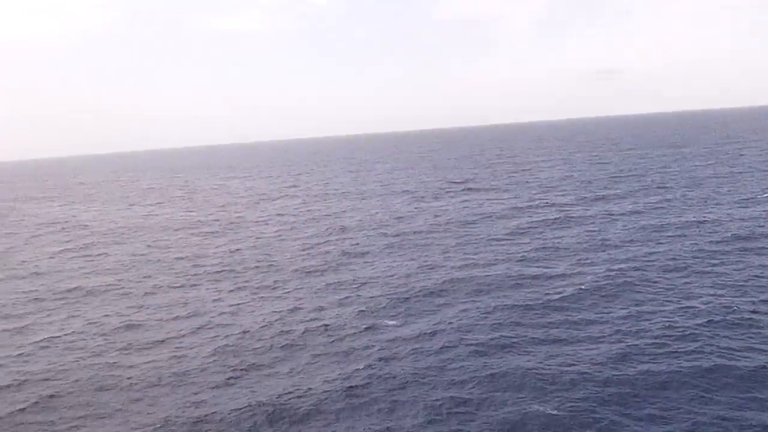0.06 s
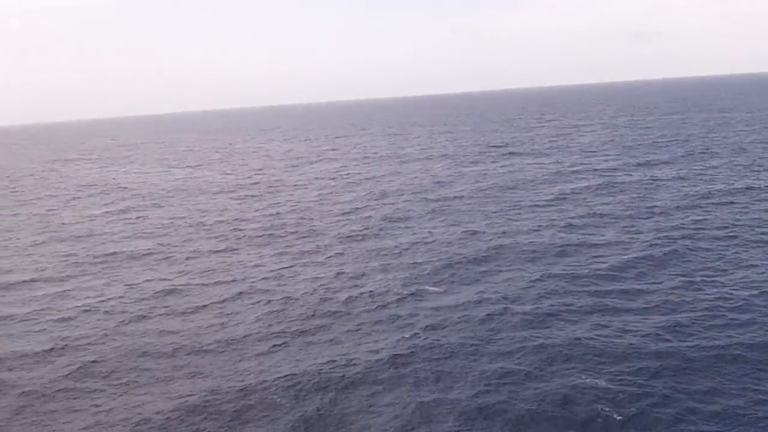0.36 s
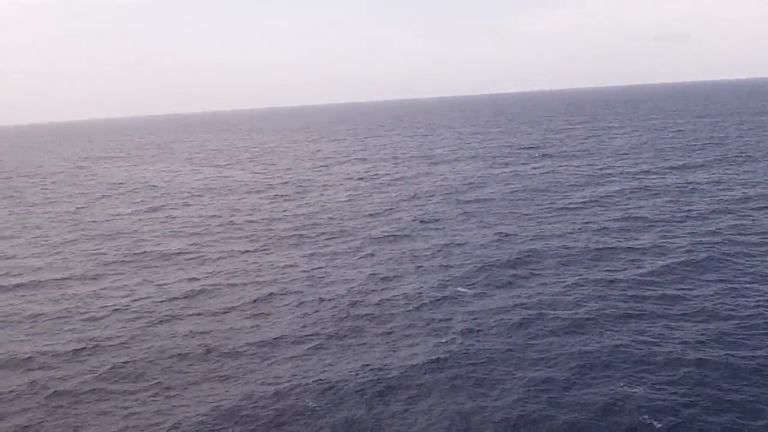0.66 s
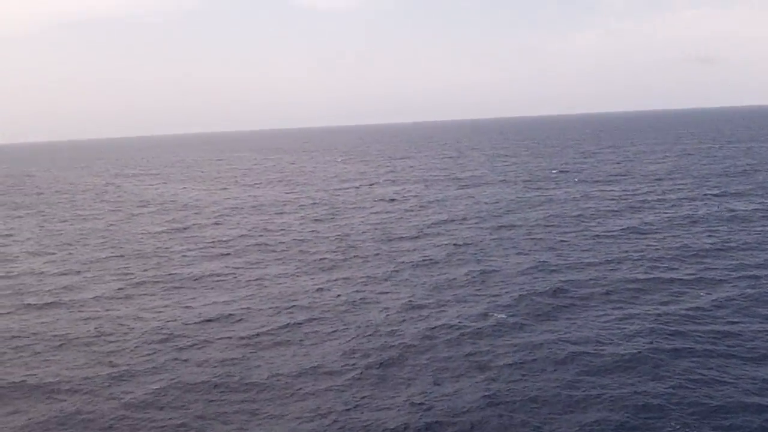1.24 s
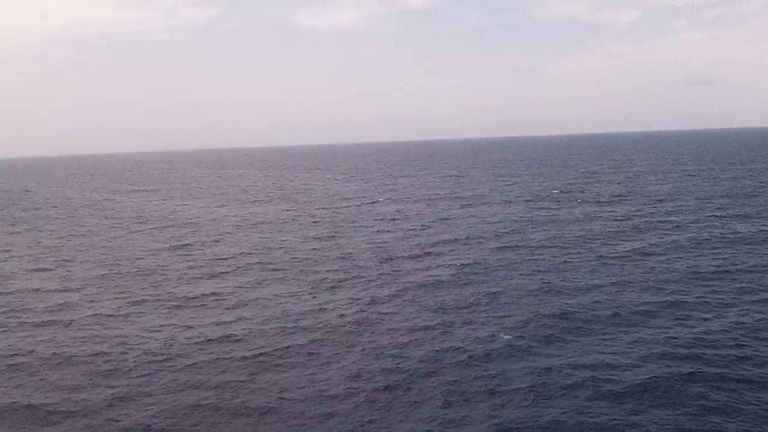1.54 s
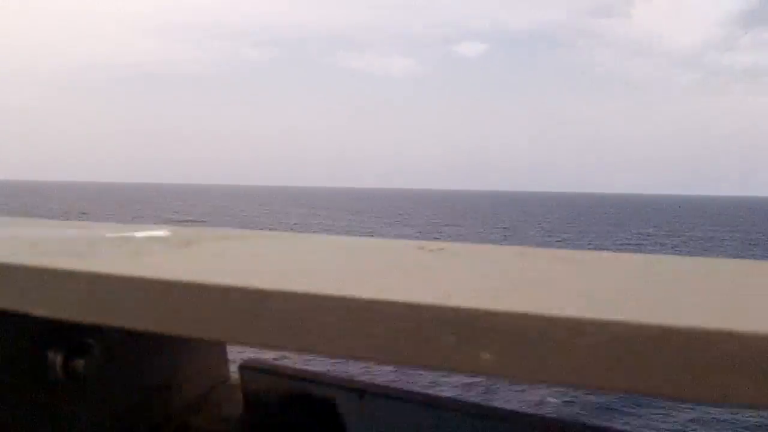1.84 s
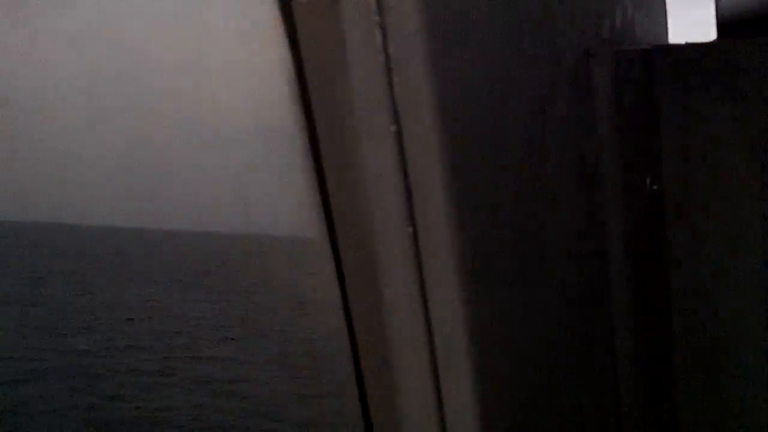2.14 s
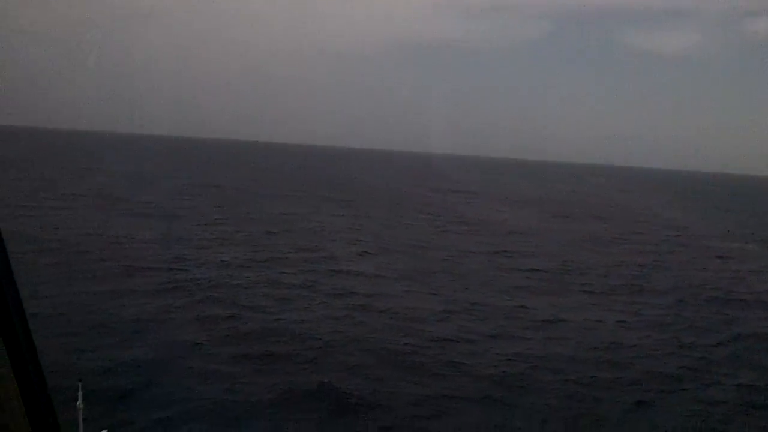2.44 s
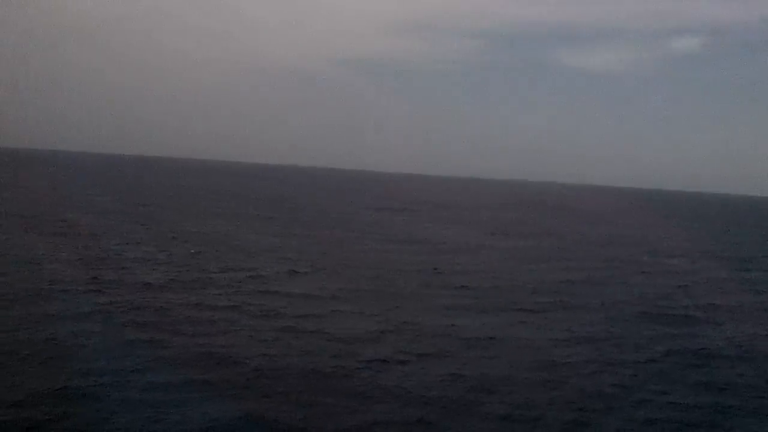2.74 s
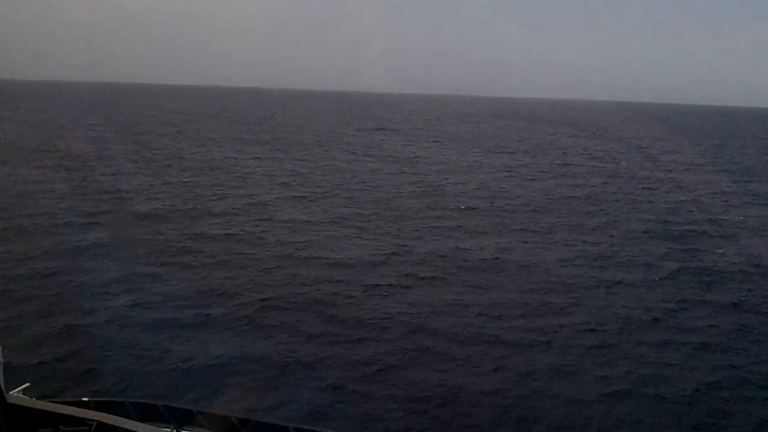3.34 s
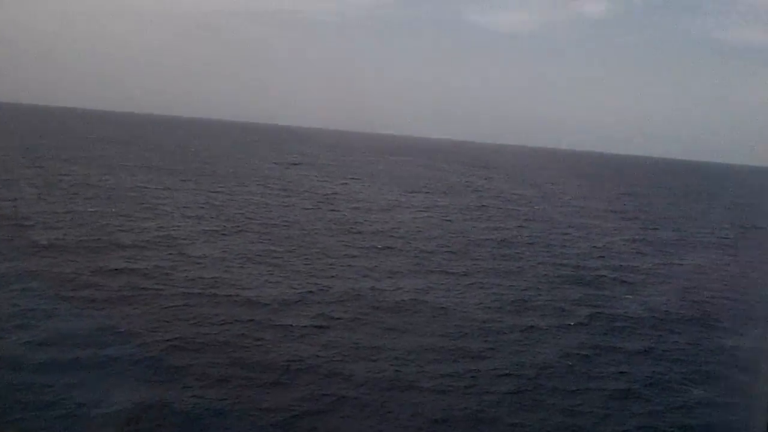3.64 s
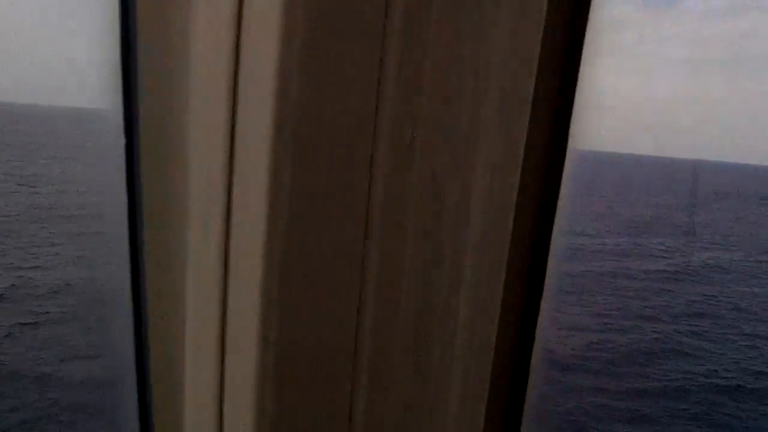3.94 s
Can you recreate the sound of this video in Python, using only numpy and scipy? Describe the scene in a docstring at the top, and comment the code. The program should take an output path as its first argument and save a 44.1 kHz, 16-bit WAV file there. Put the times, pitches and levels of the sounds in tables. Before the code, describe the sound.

Wind buffets the microphone on a ship's deck with deep thumps and tearing bursts. Halfway through, in shelter, a steady rush of wind, sea and ship takes over, with lighter buffeting and two faint taps.

```python
"""Wind buffets a camera's microphone on a ship's deck: shoves of pressure, tearing bursts of turbulence.
After two seconds, in shelter, a steady rush of wind, sea and ship takes over, with lighter buffeting,
a brief hoot, a hissing swell and two faint taps. A thin, high electronic buzz sounds once, briefly.
The camera's gain control moves in small steps, so it buzzes on big shoves and ticks as it recovers."""
import sys
import numpy as np
from scipy import signal
from scipy.fft import rfft, irfft
from scipy.io import wavfile

SR = 44100
rng = np.random.default_rng(int(sys.argv[2]) if len(sys.argv) > 2 else 0)


def generate_wav(signal):
    """Clip the signal to [-1, 1] and save it as 16-bit WAV at the path in sys.argv[1]."""
    frames = np.transpose(np.atleast_2d(signal))
    scaled = np.clip(frames, -1, 1) * 32767
    pcm = np.round(scaled).astype(np.int16)
    wavfile.write(sys.argv[1], SR, pcm)


N = 176400
TIME_S, BIN_HZ = np.arange(N) / SR, np.fft.rfftfreq(N, 1 / SR)
BAND_EDGE_HZ = 15900

# Envelopes of the continuous layers. Each row: time in seconds, level in dB.
RUSH_ENVELOPE = [(0, -55.5), (.2, -51), (.4, -52), (.9, -51), (1.2, -60.5), (1.7, -55.5), (1.87, -49.5),
                 (1.97, -45.5), (2.09, -50), (2.18, -36.5), (2.75, -36.5), (3.35, -36), (3.51, -37),
                 (3.63, -37), (3.85, -35.5), (4, -41)]
HEAVE_ENVELOPE = [(0, -35), (.2, -35.5), (.32, -24.5), (.6, -20.5), (.85, -31.5), (1.2, -34), (1.5, -32),
                  (1.85, -36), (2.1, -36.5), (2.6, -44.5), (3.2, -42.5), (3.7, -42), (4, -34.5)]
FLUTTER_ENVELOPE = [(0, -42.5), (.14, -38.5), (.22, -42.5), (.45, -32), (.75, -33), (1.02, -42),
                    (1.2, -64.5), (1.55, -43.5), (1.9, -42.5), (2.2, -49.5), (2.9, -46), (3.4, -37),
                    (3.7, -39.5), (3.9, -34.5), (4, -38)]
# Layer spectra. Each row: frequency in Hz, relative density in dB.
RUSH_SPECTRUM = [(20, -16), (70, -1), (140, 4.5), (250, 1.5), (400, 0.5), (680, -2.5), (950, -5.5),
                 (1250, -16.5), (1600, -21), (2000, -29.5), (2700, -36), (4200, -38.5), (6000, -43.5),
                 (9500, -47.5), (14000, -44.5), (15200, -63)]
HISS_SPECTRUM = [(500, -34), (1100, 8), (1900, -1.5), (2500, -19.5), (6000, -30)]
BUZZ_SPECTRUM = [(500, -14), (4000, -1), (9000, -5), (13500, -1), (15200, 10.5), (15800, -15)]
HEAVE_SPECTRUM = [(5, 7.5), (15, 1), (28, -1), (55, -9), (90, -17.5), (160, -33), (400, -35.5),
                  (1500, -100)]
FLUTTER_SPECTRUM = [(20, -15), (60, 7.5), (120, -2), (200, -0.5), (350, -13.5), (700, -23), (1100, -53),
                    (2000, -64.5), (5000, -70)]
THUD_SPECTRUM = [(40, -19.5), (110, -2), (200, 8), (320, -14), (600, -26.5), (2000, -70)]
CRACK_SPECTRUM = [(100, -5.5), (900, 4.5), (2000, -2), (3500, -10), (6000, -18), (10000, -26), (16000, -30)]
BURST_SPECTRUM = [(30, -13), (100, 6.5), (250, 1.5), (500, -2), (900, -5), (1300, -21), (2000, -38),
                  (3000, -53.5), (6000, -58.5), (16000, -83)]
# Faint knocks. Each row: start in seconds, level in dB.
TAP_HITS = [(2.106, -51.5), (2.769, -50)]
# Their resonances. Each row: frequency in Hz, gain in dB, 60 dB decay time in seconds.
TAP_RESONANCES = [(1330, -6, 0.037), (1920, 1, 0.024), (2150, -10, 0.025), (2960, -19, 0.043)]
# Short swells of noise. Each row: centre in seconds, half width in seconds, level in dB.
THUD_SWELLS = [(1.598, .012, -23), (2.93, 0.0072, -36.5), (3.183, 0.015, -35), (3.235, 0.0081, -33.5),
               (3.274, 0.01, -34.5), (3.365, 0.02, -36), (3.475, 0.012, -34.5), (3.778, .014, -33.5)]
CRACK_SWELLS = [(.946, 0.0018, -31), (1.587, 0.0029, -25.5)]
BURST_SWELLS = [(.082, 0.0049, -35), (.112, 0.0064, -37), (.150, 0.018, -39.5), (.184, 0.0089, -30),
                (.196, .008, -28), (.238, 0.0067, -32.5), (.320, 0.0087, -24.5), (.335, 0.0094, -22),
                (.423, 0.0095, -18.5), (.448, 0.0053, -16.5), (.498, 0.014, -13.5), (.592, 0.0065, -33),
                (.625, 0.018, -26), (.660, 0.008, -24), (.708, 0.007, -26.5), (.736, 0.0084, -30.5),
                (.805, 0.0046, -31), (.835, 0.004, -32), (.945, 0.0064, -24.5), (.959, 0.01, -19.5),
                (1.080, 0.0016, -35), (1.100, 0.0082, -31), (1.361, .0024, -25.5), (1.380, 0.008, -35.5),
                (1.429, 0.013, -29.5), (1.587, 0.0036, -21), (1.610, 0.0088, -19.5), (1.688, 0.0073, -29.5),
                (1.770, 0.009, -37.5), (1.906, 0.011, -39), (3.485, 0.0063, -22.5)]
# Pulses on the diaphragm. Each row: centre in seconds, level in dB, half width in seconds.
PRESSURE_PULSES = [(.109, -22, .004), (.156, -23, 0.0017), (.244, -11, .0045), (.298, -21, 0.0074),
                   (.333, -12, 0.002), (.377, -12.5, 0.0078), (.420, -1.5, 0.0038), (.437, -11, 0.0047),
                   (.51, -3, 0.0052), (.595, -4, 0.0086), (.671, -13.5, 0.0092), (.738, -16.5, 0.001),
                   (.823, -9.5, 0.0073), (.885, -18, 0.014), (.947, -5.5, 0.0048), (1.089, -11.5, 0.0082),
                   (1.223, -23.5, 0.0076), (1.308, -17, .009), (1.366, -13, .0046), (1.431, -12.5, .004),
                   (1.589, -7.5, 0.0063), (1.607, -14.5, 0.00078), (1.697, -13.5, 0.0045),
                   (1.770, -23.5, 0.0077), (1.926, -14.5, 0.0069), (3.484, -20.5, .002),
                   (3.928, -16.5, 0.0032)]
SUCTION_PULSES = [(.082, -22, .0012), (.222, -19, .005), (.310, -14.5, 0.0021), (.339, -8.5, 0.0021),
                  (.401, -11.5, 0.014), (.459, -7.5, 0.0078), (.485, -4, 0.0067), (.550, -15, 0.008),
                  (.617, -22.5, 0.0091), (.721, -19.5, 0.0052), (.972, -13.5, 0.0085), (1.358, -24, 0.0021),
                  (1.395, -12, 0.0082), (1.582, -13.5, .0014), (1.608, -10.5, 0.015),
                  (1.687, -24.5, 0.0017), (1.951, -7.5, .011), (3.371, -20.5, 0.0027),
                  (3.418, -20.5, 0.0034), (3.548, -22.5, 0.0023), (3.889, -29, .003),
                  (3.920, -25.5, 0.0036)]
# Microphone response. Each row: frequency in Hz, gain in dB.
MIC_RESPONSE = [(2, -21.5), (14, 1.5), (30, 0), (3000, -2.5), (6000, -3), (7100, -8), (7700, -16),
                (8100, -17), (8700, -7), (10000, -3.5), (14000, -5), (16000, -23.5)]


def amp(db):
    """Decibels to gain."""
    return 10 ** (np.asarray(db) / 20)


def unit_rms(x):
    """Scale to rms 1."""
    return x / np.sqrt(np.mean(x ** 2) + 1e-20)


def envelope(rows):
    """Gain over time, interpolated in dB."""
    return amp(np.interp(TIME_S, *np.transpose(rows)))


def bell(centre_s, half_width_s, peak_db):
    """Gaussian gain over time."""
    return amp(peak_db) * np.exp(-((TIME_S - centre_s) / half_width_s) ** 2)


def swells(rows):
    """Gain over time of short swells, summed in power."""
    power = sum(amp(db) ** 2 / (1 + ((TIME_S - centre_s) / half_width_s) ** 2 / 2) ** 4
                for centre_s, half_width_s, db in rows)
    return np.sqrt(power)


def filtered(x, spectrum):
    """Filter by a dB curve, interpolated in log frequency."""
    hz, db = np.transpose(spectrum)
    gain = amp(np.interp(np.log(BIN_HZ + 1), np.log(hz + 1), db))
    return irfft(rfft(x) * gain, N)


def noise(spectrum):
    """Coloured noise, rms 1."""
    return unit_rms(filtered(rng.standard_normal(N), spectrum))


def band_noise(centre_hz, half_width_hz, order):
    """Narrow-band noise, rms 1."""
    rolloff = 1 + ((BIN_HZ - centre_hz) / half_width_hz) ** order
    return unit_rms(irfft(rfft(rng.standard_normal(N)) / rolloff, N))


def turbulence(spectrum, rough_db, waver_hz):
    """Coloured noise whose strength wavers as eddies pass, rms 1."""
    waver = np.clip(band_noise(0, waver_hz, order=4), -2, 2)
    return unit_rms(filtered(rng.standard_normal(N) * amp(rough_db * waver), spectrum))


def rush():
    """Even rush of wind, sea and ship, with one hissing swell and one hollow hoot."""
    even = envelope(RUSH_ENVELOPE) * turbulence(RUSH_SPECTRUM, rough_db=0.6, waver_hz=11)
    hiss = bell(centre_s=2.82, half_width_s=0.093, peak_db=-47.5) * noise(HISS_SPECTRUM)
    hollow = band_noise(centre_hz=874, half_width_hz=60, order=2)
    hoot = bell(centre_s=2.705, half_width_s=0.016, peak_db=-34.5) * hollow
    return even + hiss + hoot


def taps():
    """Small knocks ring a few damped modes."""
    t, hits = np.arange(SR // 10) / SR, np.zeros(N)
    for start_s, db in TAP_HITS:
        hits[round(start_s * SR)] = amp(db)
    ring = sum(amp(db - 60 * t / t60_s) * np.sin(2 * np.pi * hz * t) for hz, db, t60_s in TAP_RESONANCES)
    return signal.oaconvolve(hits, ring)[:N]


def electronic_buzz(centre_s=3.473, pitch_hz=525.3):
    """Brief, thin, high electronic buzz: upper harmonics of one pitch swell and fade."""
    harmonics = sum(np.cos(2 * np.pi * (hz * (TIME_S - centre_s) + rng.random()))
                    for hz in np.arange(pitch_hz, BAND_EDGE_HZ, pitch_hz))
    return bell(centre_s, half_width_s=0.016, peak_db=-55) * unit_rms(filtered(harmonics, BUZZ_SPECTRUM))


def buffeting():
    """Air around the microphone heaves deeply and flutters in lumps."""
    heave = envelope(HEAVE_ENVELOPE) * noise(HEAVE_SPECTRUM)
    flutter = envelope(FLUTTER_ENVELOPE) * turbulence(FLUTTER_SPECTRUM, rough_db=1, waver_hz=44.7)
    return heave + flutter


def cracks():
    """Short, bright cracks, like the recorder overloading on the hardest gusts."""
    return swells(CRACK_SWELLS) * noise(CRACK_SPECTRUM)


def bursts():
    """Eddies tear across the microphone port; larger, slower ones only thud."""
    tearing = swells(BURST_SWELLS) * turbulence(BURST_SPECTRUM, rough_db=5.5, waver_hz=129)
    thuds = swells(THUD_SWELLS) * noise(THUD_SPECTRUM)
    return tearing + thuds


def shoves(pulses, wake_share=0.9):
    """Each gust moves the diaphragm one way; its wake is a longer, shallow swing the other way."""
    wake_lag, wake_spread = 1.4, 3.4  # in half widths
    out = np.zeros(N)
    for centre_s, db, half_width_s in pulses:
        near = abs(TIME_S - centre_s) < 20 * half_width_s
        offset = (TIME_S[near] - centre_s) / half_width_s
        peak = np.exp(-abs(offset) ** 1.4)
        wake = np.exp(-((offset - wake_lag) / wake_spread) ** 2) / wake_spread
        out[near] += amp(db) * (peak - wake_share * wake) / (1 - wake_share / wake_spread)
    return out


def scene():
    """Mono mix of wind, rush and taps, plus the cracks and the electronic buzz."""
    gusts = shoves(PRESSURE_PULSES) - shoves(SUCTION_PULSES)
    return (gusts + bursts() + cracks() + buffeting() + rush() + taps() + electronic_buzz())[None]


def gain_control(x, start_db=10, max_db=15, down_db=0.97, up_db=1.0):
    """Gain steps down fast while the output is over the limit, holds, then climbs slowly once calm."""
    limit_level, calm_level = 0.29, 0.23  # of full scale
    blocks_per_s, blocks_per_rise, hold_s, sensor_decay_s = 750, 4, 0.034, 0.0039
    block = (np.arange(N) * blocks_per_s / SR).astype(int)
    block_levels = np.bincount(block, abs(x)) / np.bincount(block)
    decay = np.exp(-1 / (sensor_decay_s * blocks_per_s))
    db, calm_blocks, sensed, gains = start_db, 0, 0, []
    for k, level in enumerate(block_levels):
        gains.append(amp(db))
        sensed = max(level * gains[-1], sensed * decay)
        calm_blocks = 0 if sensed > calm_level else calm_blocks + 1
        if sensed > limit_level:
            db = max(db - down_db, 0)
        elif calm_blocks > hold_s * blocks_per_s and k % blocks_per_rise == 0:
            db = min(db + up_db, max_db)
    return np.array(gains)[block]


def record(dry):
    """Stepped gain, clipping, microphone response, band limit."""
    clipped = np.clip(dry[0] * gain_control(dry[0]), -1, 1)
    lowpass = signal.firwin(255, BAND_EDGE_HZ, window=("kaiser", 8), fs=SR)
    return signal.oaconvolve(filtered(clipped, MIC_RESPONSE), lowpass, "same")[None]


dry = scene()
out = record(dry)
generate_wav(out)
```